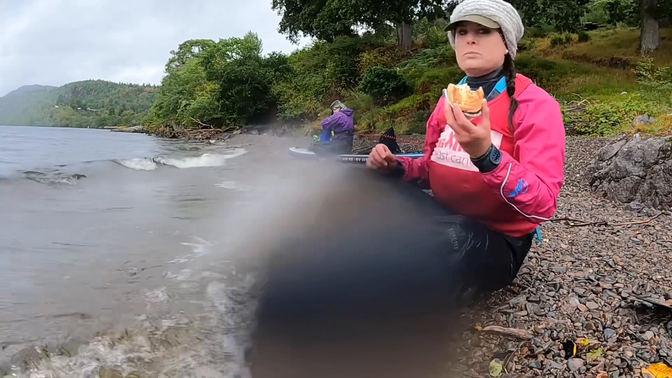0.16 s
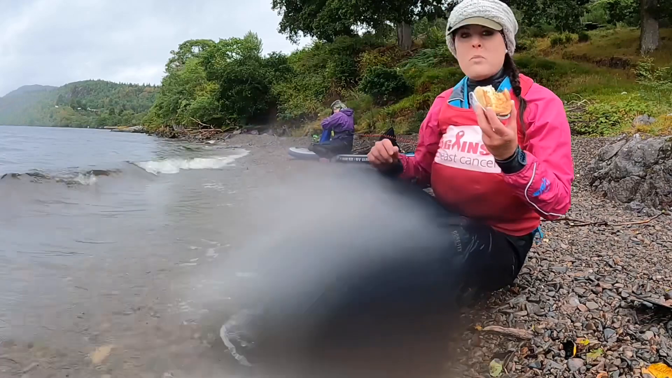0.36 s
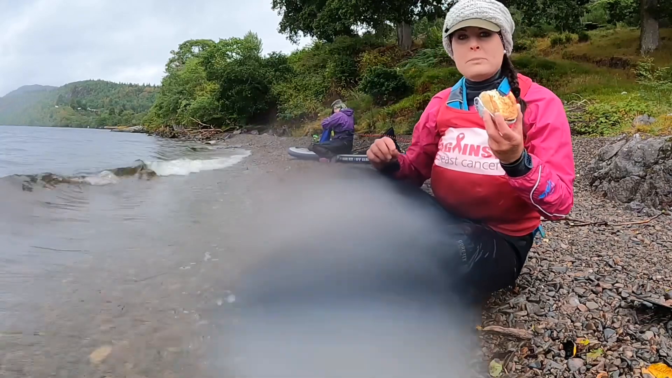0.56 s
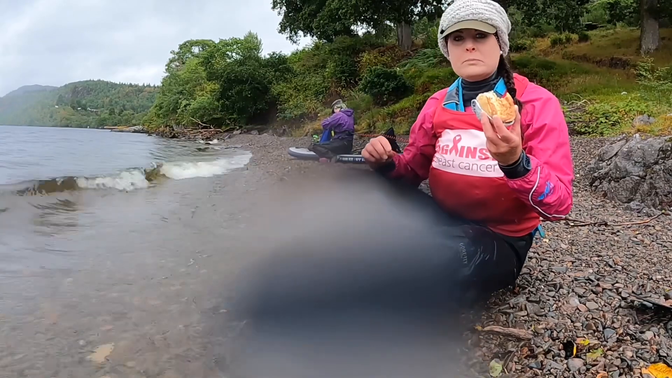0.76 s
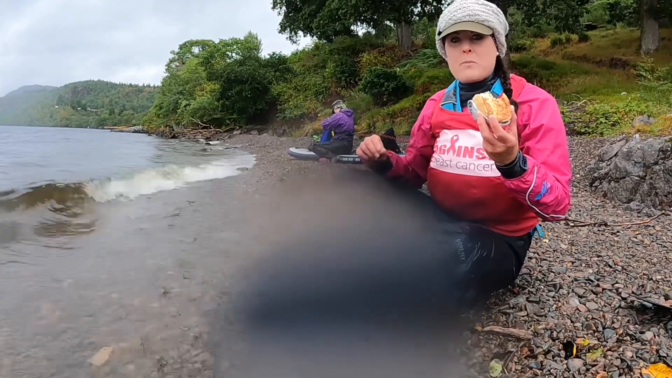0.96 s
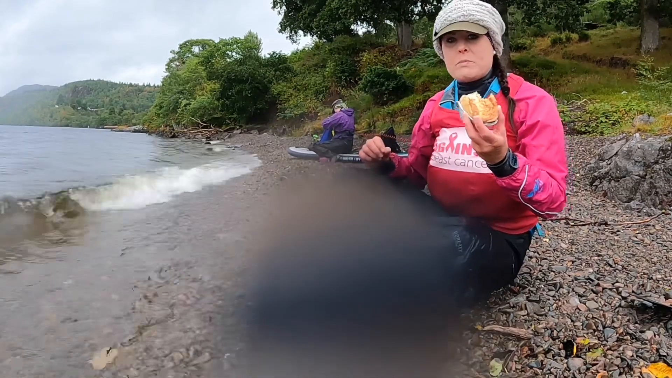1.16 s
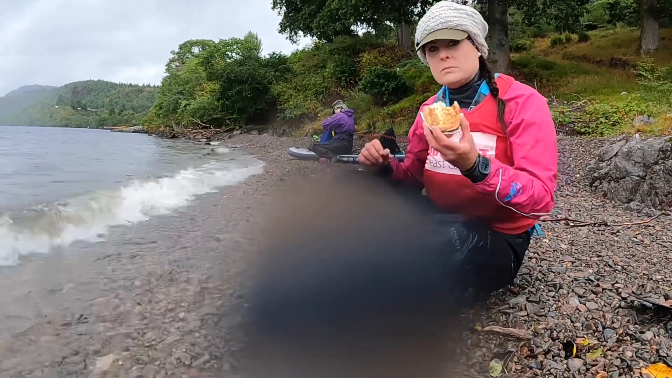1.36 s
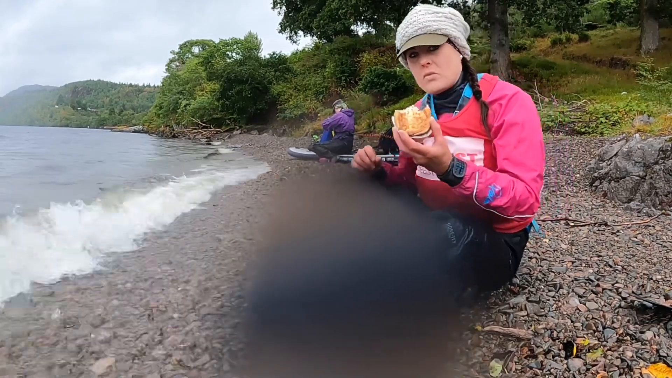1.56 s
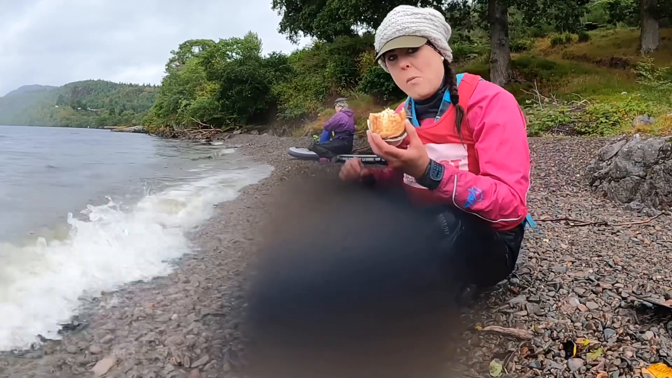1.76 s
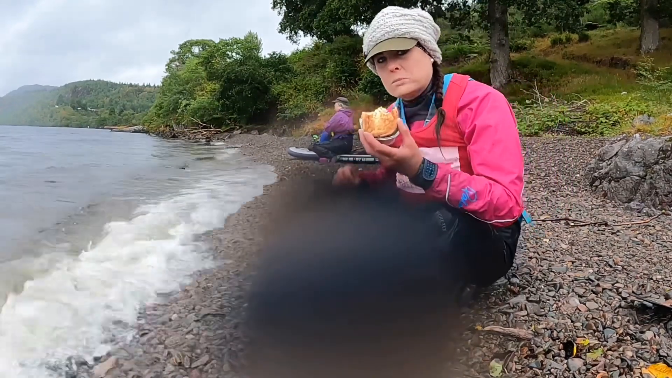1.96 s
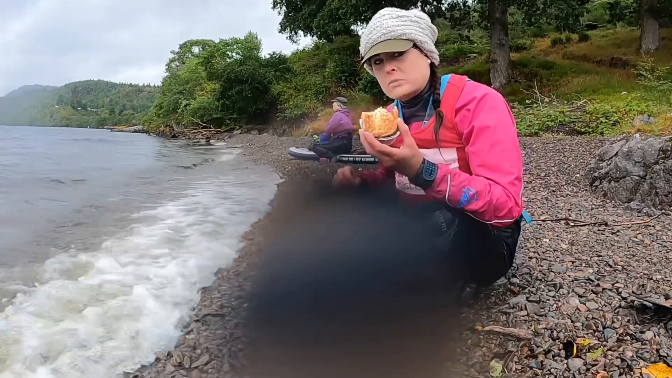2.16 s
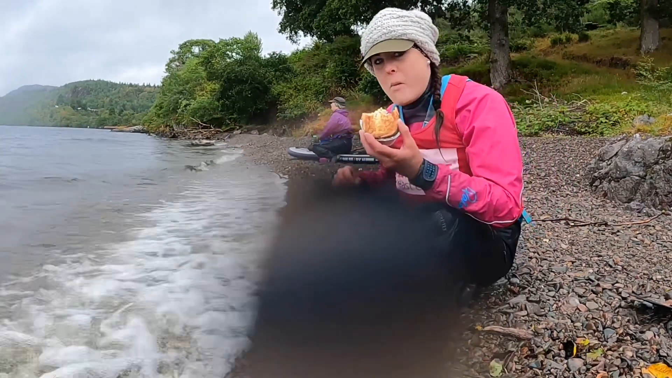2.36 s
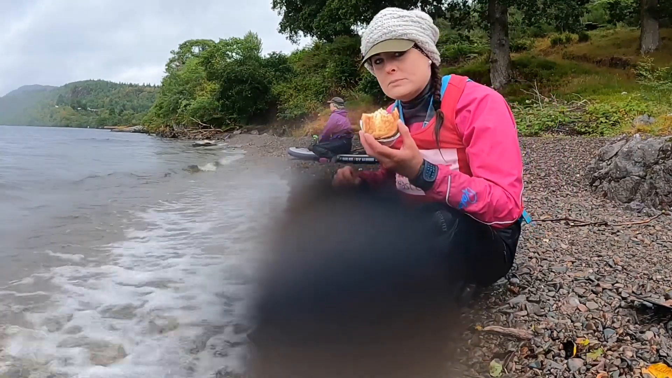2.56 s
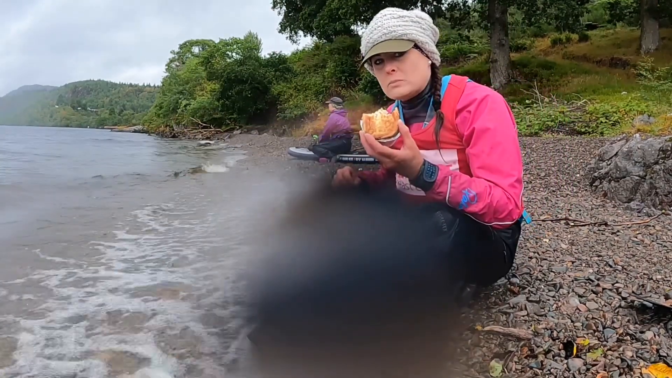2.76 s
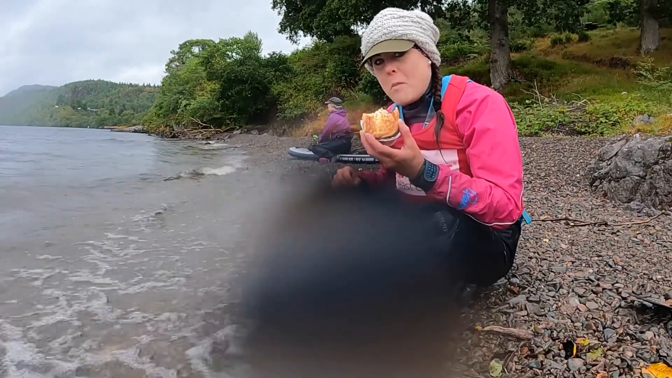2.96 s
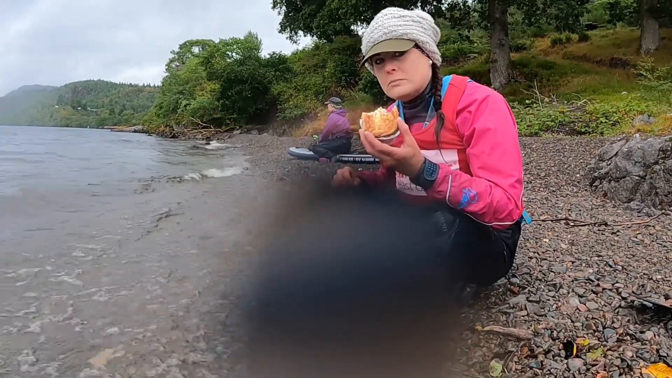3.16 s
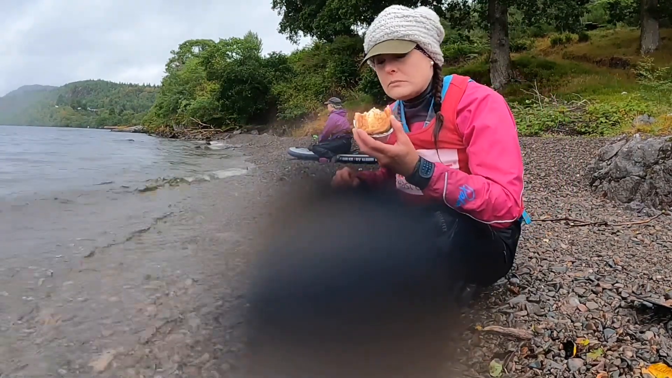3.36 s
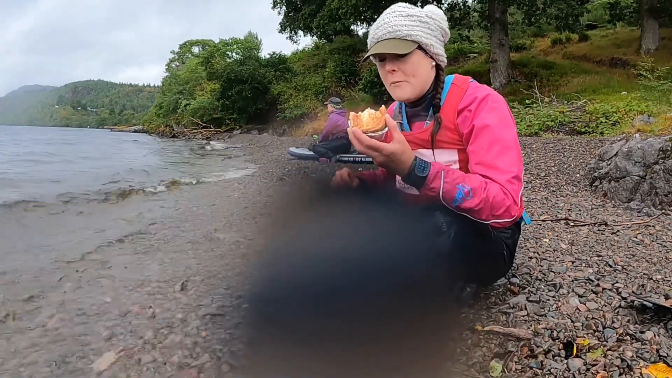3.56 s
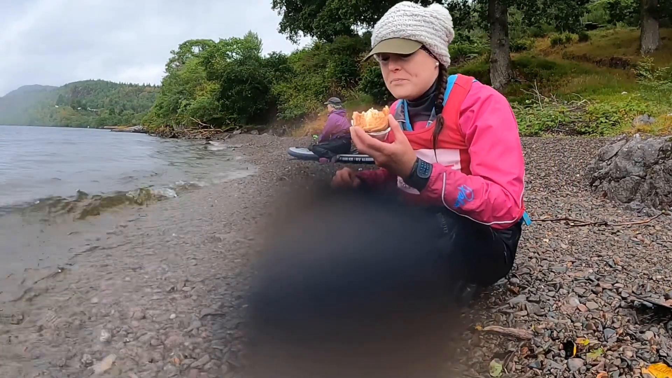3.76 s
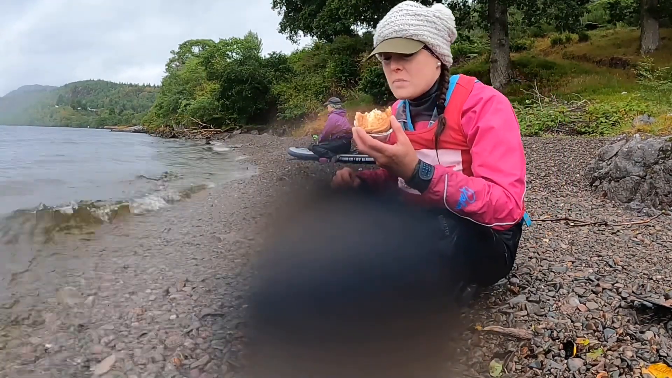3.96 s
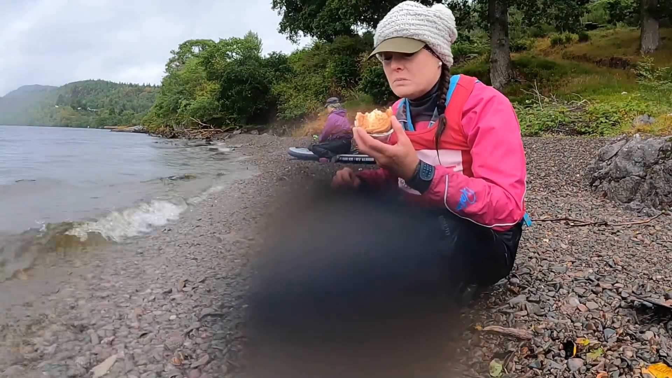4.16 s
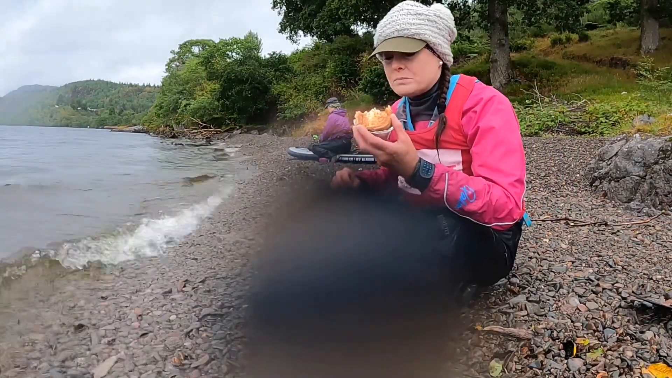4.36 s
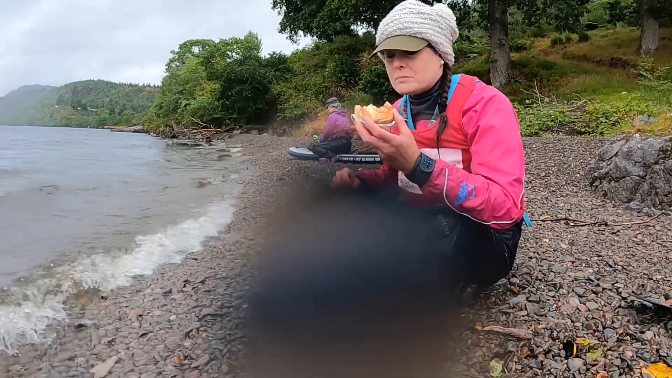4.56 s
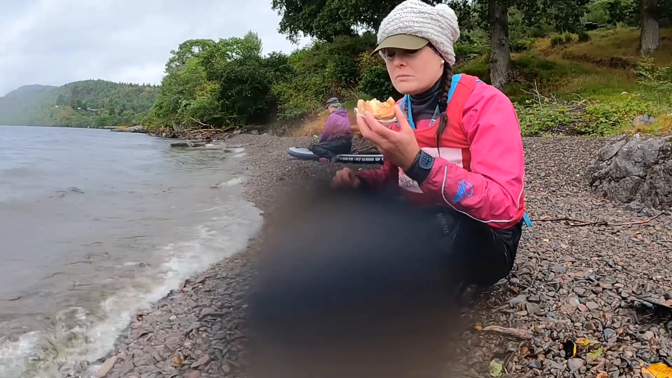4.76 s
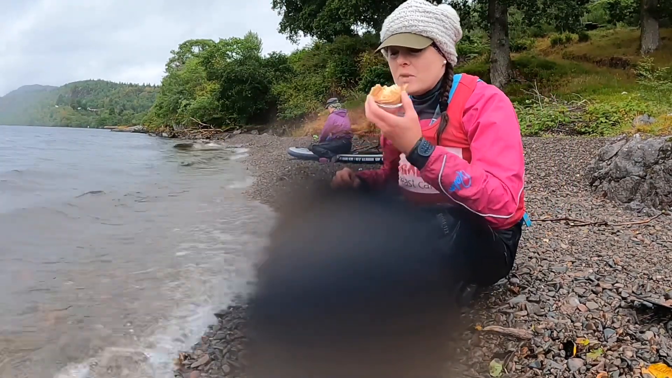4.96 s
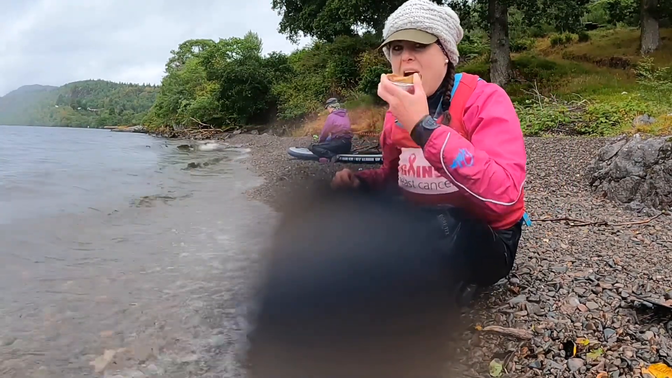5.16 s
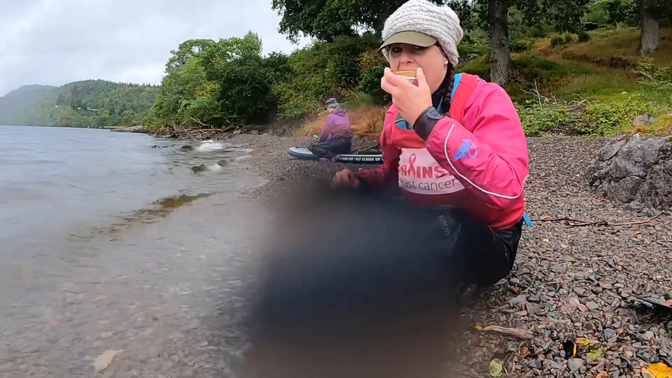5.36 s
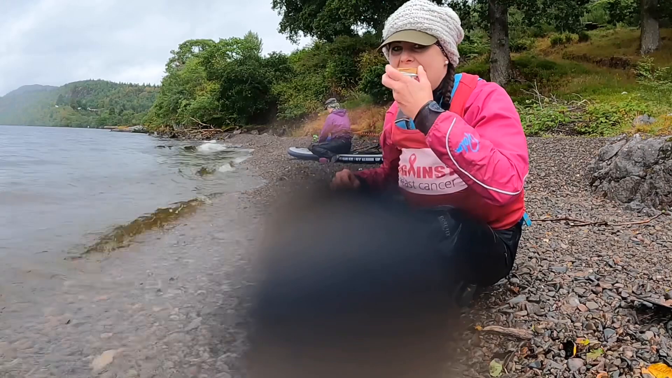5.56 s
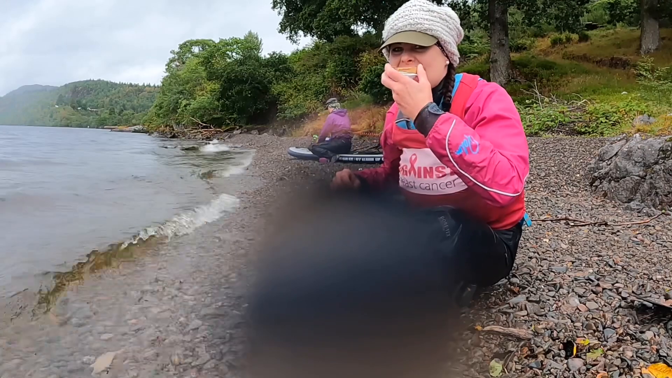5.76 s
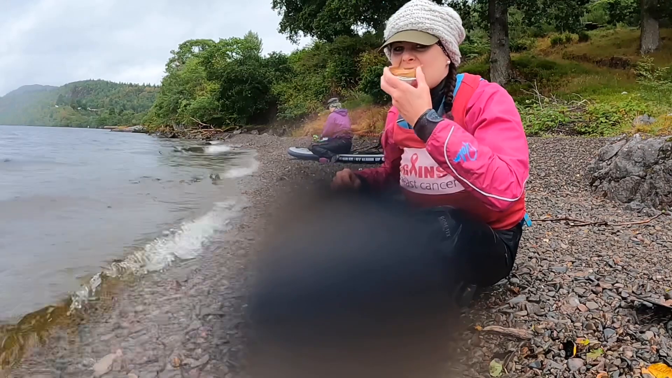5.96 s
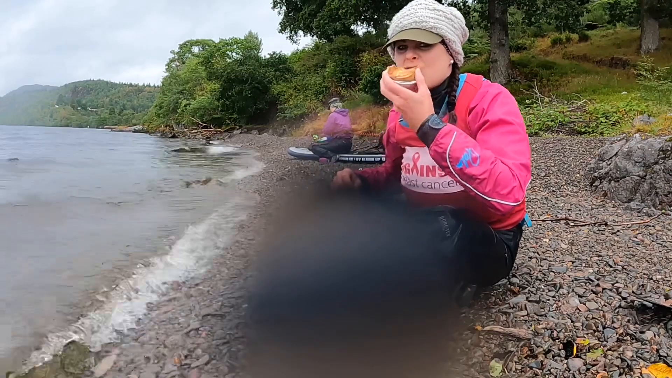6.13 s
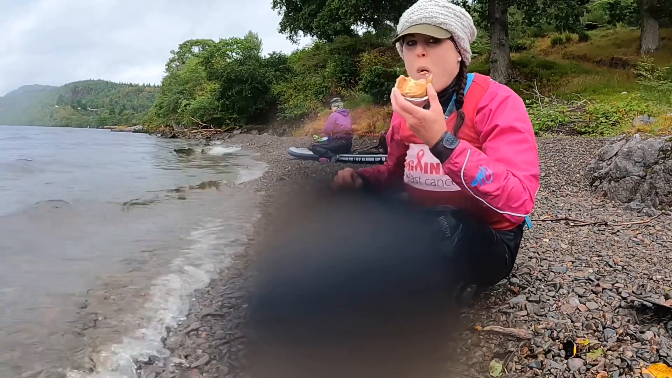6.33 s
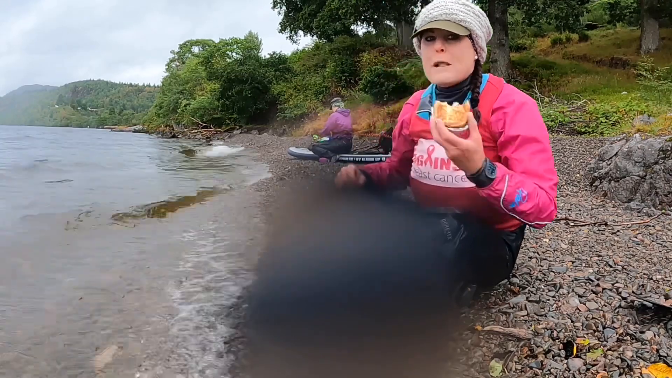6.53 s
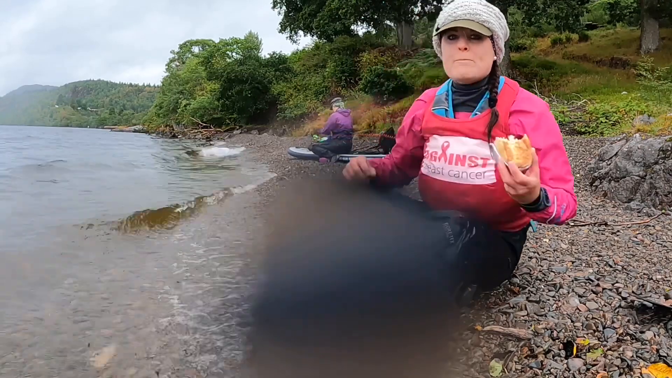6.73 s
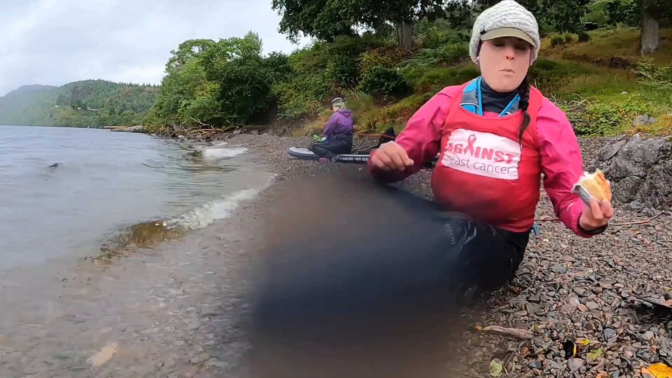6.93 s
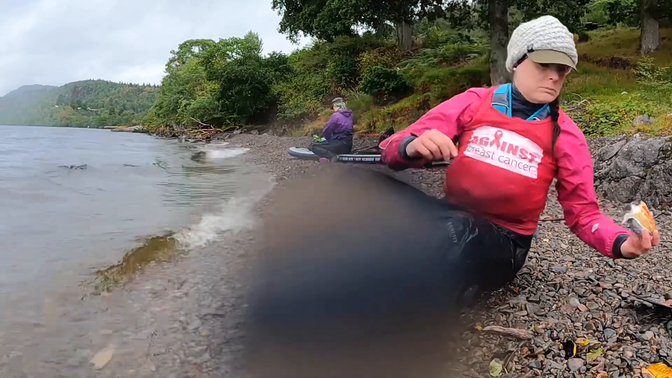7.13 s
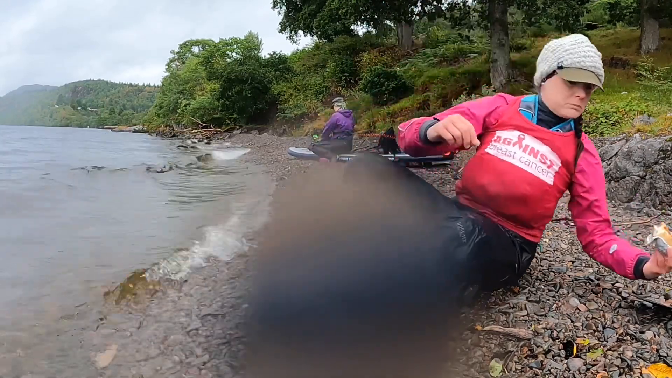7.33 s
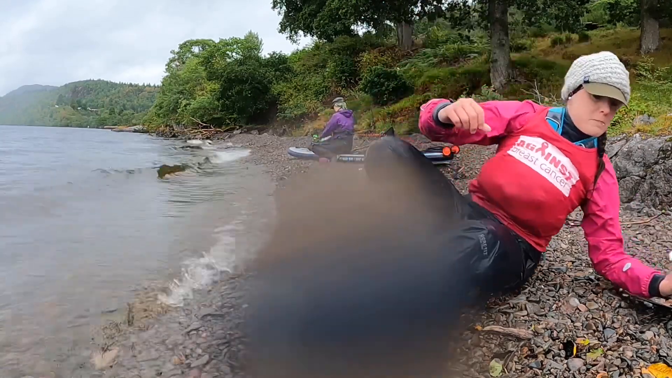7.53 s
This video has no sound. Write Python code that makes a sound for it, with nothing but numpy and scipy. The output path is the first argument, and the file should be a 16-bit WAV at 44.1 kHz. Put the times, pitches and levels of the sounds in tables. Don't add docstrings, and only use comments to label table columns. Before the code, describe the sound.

Close beside a pebbly lakeshore, a wet, waterproof microphone dulls the wash of small waves. Dense rushing surges fill the first two and a half seconds, then drain away to a near lull just before four. Smaller waves return with plopping bubbles, little splashes and pebble clicks, strongest around five. Near the end come hollow water slaps and a brief gurgling hum, with light wind rumbling low.

```python
import sys
import numpy as np
from scipy import signal
from scipy.fft import rfft, irfft, next_fast_len
from scipy.io import wavfile
from scipy.ndimage import uniform_filter1d

SR = 44100
rng = np.random.default_rng(int(sys.argv[2]) if len(sys.argv) > 2 else 0)


def inscribe(sig):
    pcm = np.round(np.clip(np.atleast_2d(sig).T, -1, 1) * 32767)
    wavfile.write(sys.argv[1], SR, pcm.astype(np.int16))


def convert_level_to_amplitude(level_db):
    exponent = np.asarray(level_db, float) / 20
    return 10 ** exponent


N = 334719

# time_s, flow_db, crest_weight_db, plunge_db
SURF_CURVE = [(0, -23.5, -8.5, 4), (.25, -19, -6, -3.5), (.65, -20, -7.5, 0), (1.08, -22.5, -1, -2.5),
              (1.35, -23, -3, 3.5), (1.8, -18.5, -3.5, 3), (2.15, -19.5, -5, 3.5), (2.45, -24, -7.5, -0.5),
              (3.08, -23.5, -6.5, -2), (3.35, -32, -14.5, -0.5), (3.72, -46, -4.5, 6.5),
              (4.03, -42, -5.5, 1), (4.2, -32.5, -3, -2.5), (4.7, -29, -4.5, -10), (5.3, -22, -10.5, -4.5),
              (5.68, -28.5, -8.5, -3.5), (6.45, -30, -9.5, -2.5), (6.85, -33.5, -8, 0.5)]
# time_s, froth_db, spray_nearness_db
FROTH_CURVE = [(0, -42, 0.5), (.28, -40.5, 1.5), (.62, -43, -4), (1.3, -40, -3), (1.75, -39.5, -5),
               (2.05, -41, -5.5), (2.3, -44, 0), (2.7, -48.5, -2), (3.17, -58.5, 4), (3.87, -56, -2),
               (4.28, -47.5, -2.5), (4.62, -47.5, 0), (4.9, -42, 2.5), (5.22, -41.5, -0.5),
               (5.5, -48, -4.5), (6.2, -52, 0), (6.47, -49, 0.5), (6.75, -50, -4)]
# time_s, level_db
WIND_CURVE = [(0, -45), (.57, -48), (.66, -41), (.9, -30), (1.12, -33), (1.22, -38), (1.4, -33.5),
              (1.8, -43.5), (1.97, -34), (2.4, -45), (3.1, -47.5), (3.45, -58), (3.72, -50.5), (4.3, -53),
              (5.2, -46), (6.0, -53.5), (7.15, -49), (7.4, -46.5)]
# crest_s, swell_db
LAP_EVENTS = [(.24, 0.5), (.46, 2), (1.01, 0.5), (1.33, 0.5), (1.5, 0.5), (2.0, 1.5), (2.169, 1.5),
              (1.66, 1.5), (2.8, 2), (3.1, -2), (4.12, -1.5), (4.27, 3.5), (4.55, 1.5), (4.85, 1.5),
              (4.969, 2), (5.24, 1), (5.33, 1), (5.968, 2.5), (6.1, 1.5), (6.26, 2.5), (6.431, 3),
              (6.669, 2.5), (6.99, 1), (7.07, 3.5), (7.21, 3.5), (7.34, 2), (7.53, 2)]

# freq_hz, density_db_per_hz
WASH_SPECTRUM = [(240, -34), (400, -4), (584, -0.5), (965, -2), (1430, -5), (1800, -16), (2340, -51),
                 (3960, -120)]
# freq_hz, density_db_per_hz
FIZZ_SPECTRUM = [(1200, -19.5), (1800, -0.5), (2500, -9), (2950, -14.5), (3250, -14.5), (3550, -20.5),
                 (4090, -30), (6170, -43), (7500, -55), (9500, -63), (12400, -99)]
# freq_hz, density_db_per_hz
BODY_SPECTRUM = [(110, -28.5), (195, 0.5), (366, 2), (420, -9), (550, -36), (920, -120)]
# freq_hz, density_db_per_hz
THUMP_SPECTRUM = [(70, -37), (100, -7), (145, 2), (200, -7.5), (270, -17), (450, -120)]
# freq_hz, density_db_per_hz
LEAK_SPECTRUM = [(10300, -66), (10800, -31), (11000, -19), (11600, -4), (12200, 5), (13200, -1.5),
                 (15600, -8.5)]
# freq_hz, density_db_per_hz
FAR_SPECTRUM = [(80, -38.5), (125, -18.5), (162, 3.5), (220, -9), (337, -11.5), (495, -7), (1220, 3.5),
                (1700, -8.5), (2550, -32.5), (3270, -33), (3890, -30.5), (5940, -41), (10000, -79.5),
                (13000, -107)]
# freq_hz, density_db_per_hz
RUMBLE_SPECTRUM = [(11, -44.5), (18, -6), (65, 0.5), (88, -1.5), (105, -16), (130, -35.5), (230, -120)]

# start_s, peak_db, pitch_hz
BUBBLE_EVENTS = [(1.008, -18, 117), (2.157, -15.5, 256), (2.65, -24, 1290), (2.925, -28, 134),
                 (6.465, -24.5, 700), (4.076, -33, 1240), (6.292, -25, 950), (4.242, -24, 460),
                 (4.261, -29, 218), (4.354, -23.5, 816), (4.555, -24, 1054), (4.678, -22, 287),
                 (4.742, -26, 255), (4.829, -17.5, 1260), (4.871, -22, 497), (4.96, -19.5, 218),
                 (4.973, -19.5, 740), (5.238, -24, 736), (5.317, -15.5, 715), (5.382, -21.5, 1534),
                 (5.932, -24.5, 980), (6.095, -26.5, 282), (6.532, -25.5, 448), (6.684, -25.5, 1200),
                 (6.989, -27.5, 780), (7.083, -27.5, 523), (7.229, -25, 915), (7.333, -28, 452),
                 (7.351, -27, 1040), (7.515, -24, 530)]
# start_s, peak_db
DROP_EVENTS = [(2.352, -42), (2.4054, -52), (2.5525, -55.5), (3.6745, -54), (3.9748, -56.5), (4.2831, -47),
               (4.4926, -50.5), (4.7296, -49), (5.0254, -47), (5.1192, -41), (5.1571, -43.5),
               (5.2344, -53.5), (5.2689, -52), (5.4285, -55), (6.2212, -46.5), (6.3025, -53),
               (6.3963, -53.5), (6.4552, -57.5), (6.5045, -48.5), (6.54, -57.5), (6.6777, -51),
               (6.7455, -58), (6.7759, -56.5), (6.8388, -56.5), (6.9101, -55.5), (7.1426, -54.5)]
# start_s, peak_db
SPLASH_EVENTS = [(2.5924, -50), (3.0794, -53), (3.1363, -48), (3.3994, -61), (3.7993, -50), (4.0497, -52),
                 (4.0956, -46), (4.1454, -45), (4.2484, -54), (4.2954, -52), (4.3524, -53), (4.6638, -47),
                 (4.8274, -39), (4.8934, -47), (4.9374, -43), (5.1652, -41.5), (5.2364, -43),
                 (5.2694, -44.5), (5.4144, -52), (6.1145, -50), (6.2213, -41), (6.3174, -53), (6.4697, -43),
                 (6.6134, -54), (6.8494, -52), (6.9994, -51), (7.2504, -45), (7.3014, -47), (7.4106, -50),
                 (7.4694, -49)]
# start_s, peak_db, mode_hz
PEBBLE_EVENTS = [(3.1367, -54, 3110), (4.0955, -40, 3000), (4.2097, -39, 3190), (4.6637, -35, 3050),
                 (4.8268, -37, 3220), (4.8602, -42, 3250), (4.9386, -44, 2980), (4.9695, -40, 2850),
                 (5.1356, -41, 2840), (5.2698, -40, 2820), (5.3855, -52, 3210), (6.1149, -44, 3160),
                 (6.2214, -35, 3150), (6.2213, -51, 4950), (6.2216, -56, 5600), (6.62, -53, 5700),
                 (6.3474, -43, 3130), (6.4471, -39, 2880), (6.4696, -40, 3040), (6.6786, -50, 2850),
                 (7.2498, -36, 3040), (7.3092, -39, 3270), (7.5057, -40, 3240)]
# start_s, peak_db, pitch_hz, t60_s
SLAP_EVENTS = [
    (3.728, -29.5, 935, 0.032),
    (3.916, -28, 860, 0.016),
    (5.168, -18, 186, 0.079),
    (6.2212, -13.5, 856, 0.026),
    (6.2305, -26, 295, 0.036),
    (6.438, -15.5, 626, 0.052),
    (6.622, -15.5, 905, 0.024),
    (6.7315, -20, 1010, 0.021),
]
# start_s, length_s, first_pitch_hz, last_pitch_hz, level_db
POCKET_EVENTS = [
    (6.224, 0.13, 264.4, 318, -25.5),
    (6.406, 0.065, 310, 260, -29.5),
]

SMALL_PER_FROTH, FROTH_USUAL_DB = .55, -18.5
PLUNGE_DB = -5.5
SPRAY_PER_FROTH, SPRAY_DB = 1.1, -68
FILM_CLOSES_S, FILM_CLOSING_S, FILM_CLEARS_S, FILM_DB = .76, 0.091, 2.16, -37.5
FILM_DRAIN_DB_PER_S, FILM_LATE_S_PER_KHZ = 58.5, .05
FAR_DB = -46.5
LAP_RISE_S, LAP_FALL_S = 0.027, 0.058
BUBBLE_S_AT_500_HZ, SHORTER_WITH_PITCH = .012, .65
SPLASH_T60_S, SPLASH_DB = .025, 9.5
POCKET_FADE_DB_PER_S = 68


def in_time(rows):
    s, *columns = np.transpose(rows)
    return [np.interp(np.arange(N) / SR, s, c) for c in columns]


def rms_one(x):
    return x / np.sqrt(np.mean(x ** 2) + 1e-20)


def drift(rate_hz):
    r = np.exp(-80 * np.pi * rate_hz / SR)
    slow = signal.lfilter([1], [1, -2 * r, r * r], rng.standard_normal(N // 40 + 2002))[2000:]
    return np.interp(np.arange(N) / 40, np.arange(len(slow)), rms_one(slow))


def colour(x, spectrum):
    size = next_fast_len(N + SR)
    hz = np.maximum(np.arange(size // 2 + 1) * SR / size, 1)
    at_hz, db = np.transpose(spectrum)
    gain = convert_level_to_amplitude(np.interp(np.log(hz), np.log(at_hz), db))
    return rms_one(irfft(rfft(x, size) * gain, size)[:N])


def churn(low_hz, high_hz, count, shared_db, own_db, fast_db):
    out, together, quick = 0, drift(3.4), drift(22.0)
    white = rng.standard_normal((2, N))
    edges_hz = np.geomspace(low_hz, high_hz, count + 1)
    for k in range(count):
        band_pass = signal.butter(2, edges_hz[k:k + 2], "band", fs=SR, output="sos")
        band = signal.sosfilt(band_pass, white[k % 2])
        out = out + band * convert_level_to_amplitude(shared_db * together + own_db * drift(31.0) + fast_db * quick)
    return rms_one(out)


def ring(hits, hz, t60_s):
    r, w = convert_level_to_amplitude(-60 / (t60_s * SR)), 2 * np.pi * hz / SR
    return signal.lfilter([0, np.sin(w)], [1, -2 * r * np.cos(w), r * r], hits + 1e-18)


def clicks(per_s, spread_db):
    sizes = convert_level_to_amplitude(spread_db * np.minimum(rng.exponential(1, N), 5)) * rng.choice([-1, 1], N)
    return sizes * (rng.random(N) < per_s / SR)


def bubble_cloud(per_s, low_hz, high_hz, cycles, spread_db):
    born, dealt = clicks(per_s, spread_db), rng.integers(0, 18, N)
    out = 0
    for k, hz in enumerate(np.geomspace(low_hz, high_hz, 18)):
        rung = ring(born * (dealt == k), hz, cycles / hz)
        swelled = ring(rung, hz, 0.16 * cycles / hz)
        out = out + rms_one(swelled) * np.sqrt(hz)
    return rms_one(out)


def surf():
    flow_db = in_time(SURF_CURVE)[0]
    small_db = SMALL_PER_FROTH * (in_time(FROTH_CURVE)[0] - flow_db - FROTH_USUAL_DB)
    mean_flow_db = uniform_filter1d(flow_db, size=SR // 2)
    bubbly = convert_level_to_amplitude(np.clip(-.3 * (mean_flow_db + 28.5), -6, 0) - 4.0)
    cloud = bubble_cloud(450.0, 400, 1834, cycles=26.0, spread_db=3.0)
    roar = churn(315.0, 2376, count=8, shared_db=0.35, own_db=1.26, fast_db=-0.8)
    wash = colour(roar + bubbly * cloud, WASH_SPECTRUM) / np.sqrt(1 + bubbly ** 2)
    deep = signal.sosfilt(signal.butter(2, 900, fs=SR, output="sos"), wash)
    return convert_level_to_amplitude(flow_db + 0.32) * (deep + convert_level_to_amplitude(small_db) * (wash - deep))


def foam():
    cloud = bubble_cloud(1500.0, 1800, 8000, cycles=42.0, spread_db=2.0)
    hiss = churn(1300, 12000, count=7, shared_db=0.0, own_db=-0.8, fast_db=1.16)
    return convert_level_to_amplitude(in_time(FROTH_CURVE)[0] + 1.28) * colour(hiss + convert_level_to_amplitude(-7.5) * cloud, FIZZ_SPECTRUM)


def breaker():
    flow_db, weight_db, plunge_db = in_time(SURF_CURVE)
    glugs = bubble_cloud(160.0, 98.4, 445, cycles=15.0, spread_db=4.0)
    low = churn(59.7, 510, count=6, shared_db=0.8, own_db=1.0, fast_db=0.54) + convert_level_to_amplitude(-8.5) * glugs
    thump = convert_level_to_amplitude(PLUNGE_DB + 1.8 * plunge_db) * colour(low, THUMP_SPECTRUM)
    return convert_level_to_amplitude(flow_db + weight_db - 3.0) * (colour(low, BODY_SPECTRUM) + thump)


def film(late_s):
    t = np.arange(N) / SR
    shut_db = FILM_DB * np.clip((t - FILM_CLOSES_S) / FILM_CLOSING_S, 0, 1)
    drained_db = FILM_DRAIN_DB_PER_S * (t - FILM_CLEARS_S - late_s)
    return np.maximum(shut_db, np.minimum(drained_db, 0))


def spray():
    froth_db, near_db = in_time(FROTH_CURVE)
    hiss = rng.standard_normal(N) * convert_level_to_amplitude(1.0 * drift(9.0) + 1.5 * drift(45.0))
    density = signal.lfilter([1], [1, -.97], clicks(200.0, spread_db=2.0) ** 2) ** .5
    patter = density * rng.standard_normal(N)
    level_db = SPRAY_DB + SPRAY_PER_FROTH * (froth_db + 48) + near_db
    rest = convert_level_to_amplitude(level_db) * colour(hiss + convert_level_to_amplitude(-5.0) * rms_one(patter), LEAK_SPECTRUM)
    fine = 0
    for khz in (12.6, 13.6, 14.6, 17.0):
        lower = signal.sosfiltfilt(signal.butter(6, 1000 * khz, fs=SR, output="sos"), rest)
        late_s = FILM_LATE_S_PER_KHZ * (min(khz, 15.6) - 13)
        fine = fine + convert_level_to_amplitude(film(late_s)) * lower
        rest = rest - lower
    hits = np.zeros(N)
    for s, db in DROP_EVENTS:
        hits[round(s * SR)] = convert_level_to_amplitude(db - 4.5)
    burst = signal.lfilter([1], [1, -convert_level_to_amplitude(-60 / (.02 * SR))], hits)
    drops = burst * colour(rng.standard_normal(N), LEAK_SPECTRUM)
    return fine + signal.sosfilt(signal.butter(6, 11200, "high", fs=SR, output="sos"), drops)


def far_shore():
    return convert_level_to_amplitude(FAR_DB) * colour(rng.standard_normal(N), FAR_SPECTRUM)


def wind():
    gusts = rng.standard_normal(N) * convert_level_to_amplitude(2.4 * drift(1.0))
    return convert_level_to_amplitude(in_time(WIND_CURVE)[0]) * colour(gusts, RUMBLE_SPECTRUM)


def laps():
    s, db = np.transpose(LAP_EVENTS)
    t = np.arange(0, N + 64, 64)[:, None] / SR - s
    decay = np.where(t < 0, (t / LAP_RISE_S) ** 2, t / LAP_FALL_S)
    swell_db = np.sum(db * np.exp(-decay), axis=1)
    return np.interp(np.arange(N) / 64, np.arange(len(swell_db)), swell_db)


def big_bubbles():
    out = np.zeros(N)
    for (s, db, hz), turn in zip(BUBBLE_EVENTS, rng.random((len(BUBBLE_EVENTS), 1))):
        length_s = BUBBLE_S_AT_500_HZ * (500 / hz) ** SHORTER_WITH_PITCH
        t = np.arange(int(5 * length_s * SR)) / SR
        u = t / (0.58 * length_s)
        shape = (u * np.exp(1 - u)) ** 2
        tone = convert_level_to_amplitude(db) * shape * np.sin(2 * np.pi * (hz * t * (1 + .012 * u) + turn))
        at = round(s * SR)
        out[at:at + len(t)] += tone[:N - at]
    return out


def splashes():
    hits = np.zeros(N)
    for s, db in SPLASH_EVENTS:
        hits[round(s * SR)] = convert_level_to_amplitude(db + SPLASH_DB)
    burst = signal.lfilter([1], [1, -convert_level_to_amplitude(-60 / (SPLASH_T60_S * SR))], hits)
    fizz = signal.lfilter([1, -.85], [1], colour(rng.standard_normal(N), FIZZ_SPECTRUM))
    return signal.sosfilt(signal.butter(6, 7000, fs=SR, output="sos"), burst * fizz)


def pebbles():
    out = np.zeros(N)
    t = np.arange(int(.02 * SR)) / SR
    shape = (1 - np.exp(-t / 0.0011)) * convert_level_to_amplitude(-60 * t / 0.012)
    for s, db, hz in PEBBLE_EVENTS:
        at = round(s * SR)
        tone = convert_level_to_amplitude(db + 3.0) * shape * np.sin(2 * np.pi * hz * t)
        out[at:at + len(t)] += tone[:N - at]
    return out


def slaps():
    out = np.zeros(N)
    for s, db, hz, t60_s in SLAP_EVENTS:
        hit = np.zeros(N)
        hit[round(s * SR)] = 1
        tone = ring(ring(hit, hz, t60_s), hz, 3.3 / hz)
        out += convert_level_to_amplitude(db) * tone / np.abs(tone).max()
    return out


def pockets():
    out = np.zeros(N)
    for s, length_s, first_hz, last_hz, db in POCKET_EVENTS:
        t = np.arange(N) / SR - s
        edge = np.clip(np.minimum(t, length_s - t) / 0.005, 0, 1)
        phase = 2 * np.pi * t * (first_hz + (last_hz - first_hz) * t / length_s / 2)
        level_db = db - POCKET_FADE_DB_PER_S * np.clip(t, 0, length_s) + .5 * drift(30.0)
        out += edge * convert_level_to_amplitude(level_db) * (np.sin(phase) + 0.12 * np.sin(2 * phase))
    return out


def scene():
    swell_db = laps()
    water = convert_level_to_amplitude(swell_db) * (surf() + foam()) + convert_level_to_amplitude(.6 * swell_db) * breaker()
    water = water + spray() + far_shore()
    events = big_bubbles() + splashes() + pebbles() + slaps() + pockets()
    return (water + wind() + events)[None]


def top_cut(x):
    return signal.sosfilt(signal.butter(12, 15730, fs=SR, output="sos"), x)


def record(dry):
    noisy = dry + convert_level_to_amplitude(-104.0) * rng.standard_normal(dry.shape)
    return top_cut(noisy)


dry = scene()
out = record(dry)
inscribe(out)
```